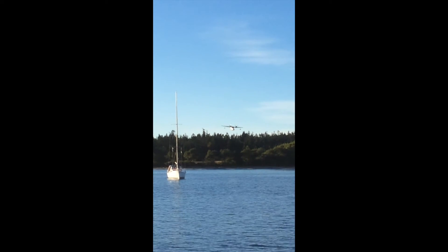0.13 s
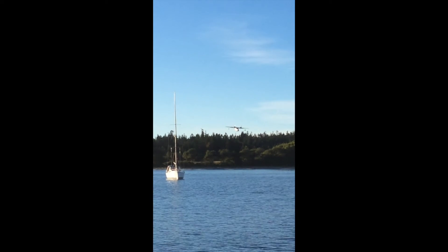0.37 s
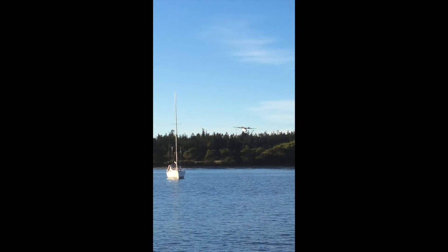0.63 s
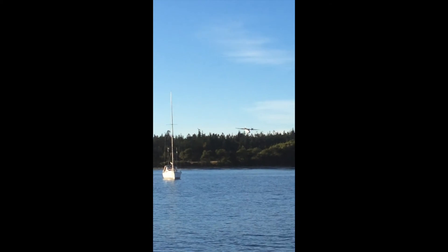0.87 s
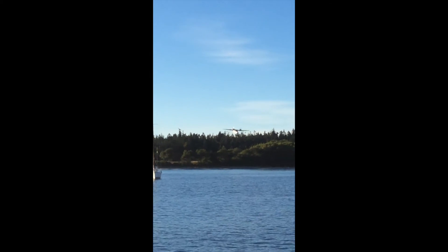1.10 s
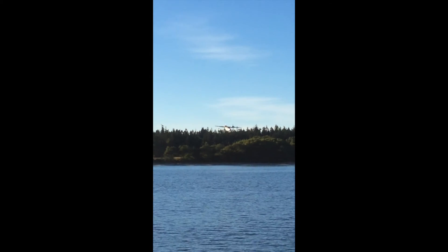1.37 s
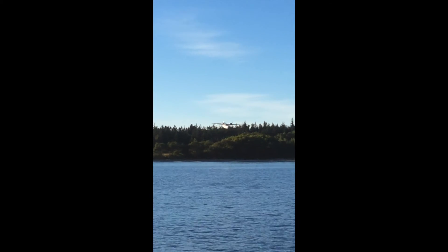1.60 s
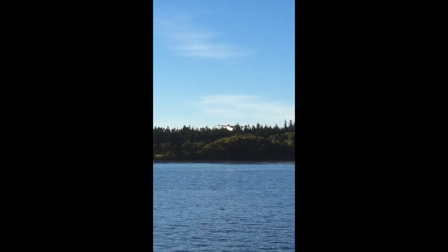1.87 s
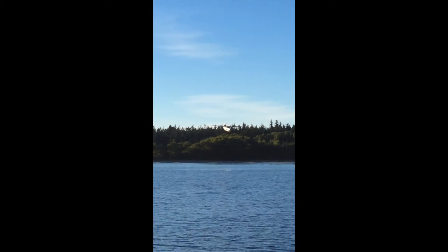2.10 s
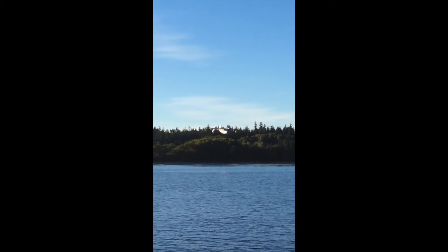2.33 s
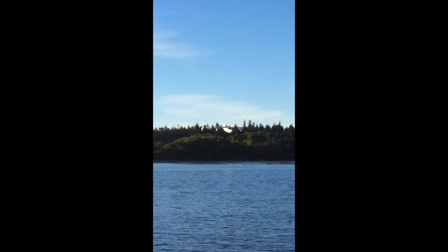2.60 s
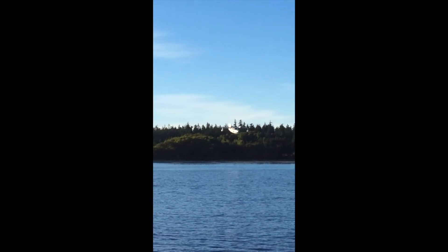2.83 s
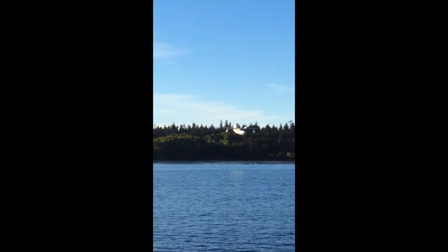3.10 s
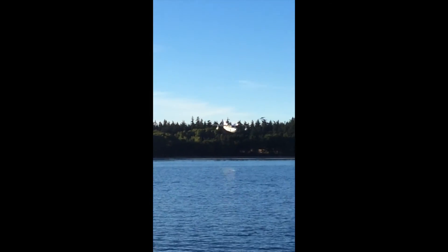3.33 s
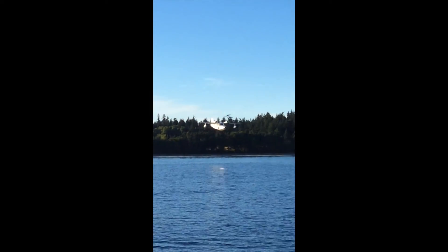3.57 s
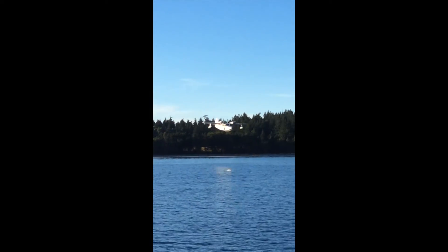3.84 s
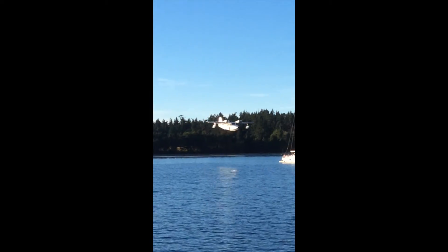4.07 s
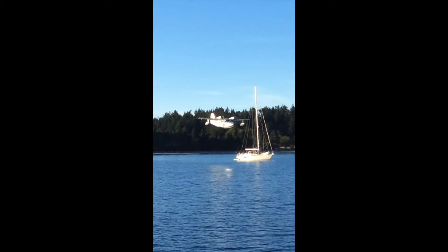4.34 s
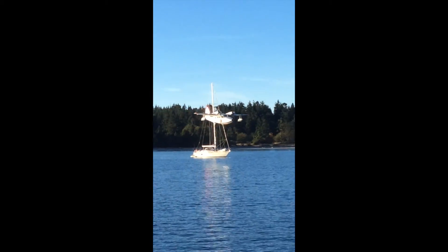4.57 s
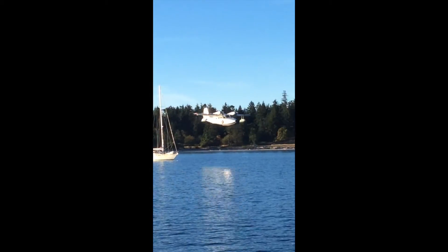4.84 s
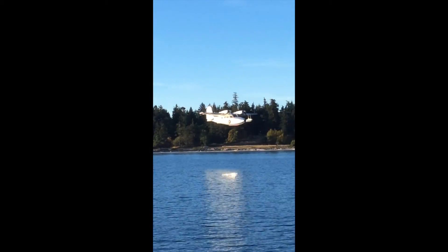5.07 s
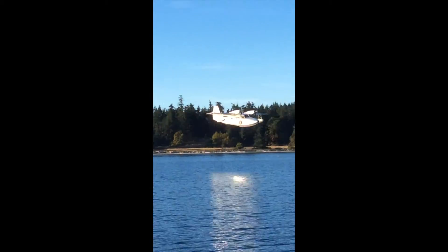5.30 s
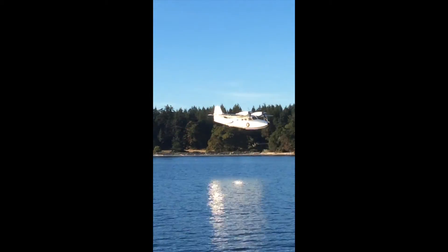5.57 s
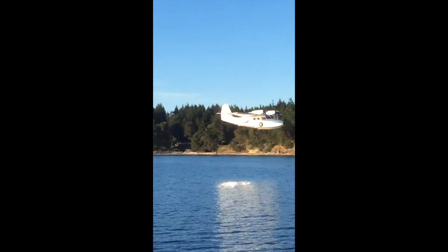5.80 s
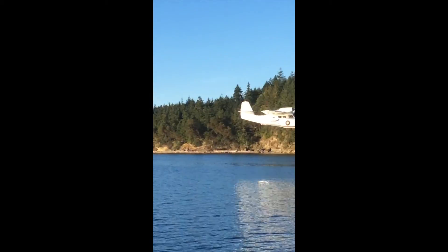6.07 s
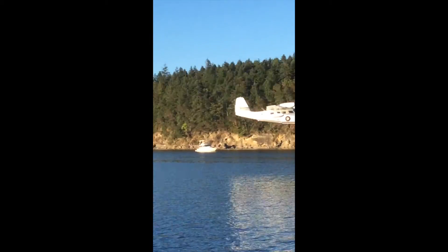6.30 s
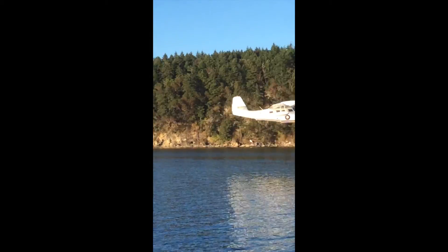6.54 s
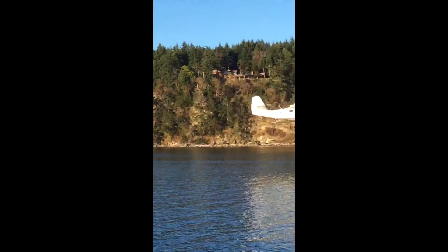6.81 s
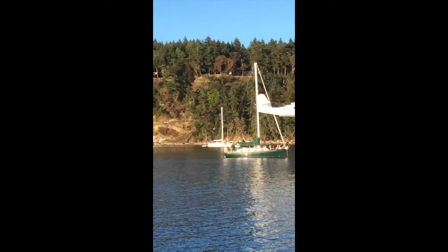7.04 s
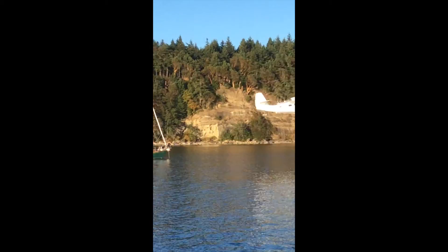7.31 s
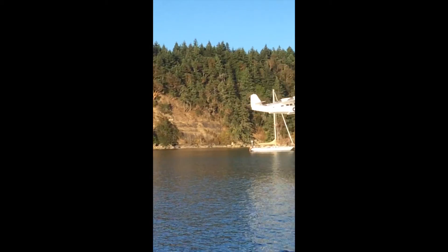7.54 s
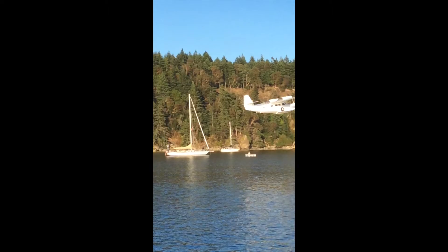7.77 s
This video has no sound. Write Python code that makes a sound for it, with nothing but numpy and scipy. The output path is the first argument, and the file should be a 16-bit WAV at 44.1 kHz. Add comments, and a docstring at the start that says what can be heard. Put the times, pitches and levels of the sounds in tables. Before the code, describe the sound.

Outdoors over open calm water, a twin-engine propeller plane flies in low. Its distant, dull drone pulses slowly as the two engines beat, then grows brighter and louder into a chopped, raspy roar. Around the close pass the pitch slides down while the roar stays strong. A small handheld microphone adds faint hiss and boxy colour, with soft wind thumps that become heavier toward the end.

```python
"""Over calm water a twin-engine propeller plane comes in low and passes a small microphone.
Two nine-cylinder engines with three-blade propellers run nearly in step: their tones, summed by
shaft order, swell and fade as they beat. Chopped noise makes the roar; the air dulls it from afar
and the water's echo draws a moving comb through it. Low noise and single pressure pulses are the
gusts that thump the microphone; faint hiss, housing, hand and a treble step colour the whole."""
import sys
import numpy as np
from scipy import signal
from scipy.io import wavfile
from scipy.ndimage import uniform_filter1d

SR = 44100
rng = np.random.default_rng(int(sys.argv[2]) if len(sys.argv) > 2 else 0)


def inscribe(sig):
    """Save sig as 16-bit PCM at rate SR to the path in sys.argv[1].

    A 1-D sig is mono; a 2-D sig holds one channel per row.
    Samples are clipped to [-1, 1] before scaling.
    """
    pcm = np.round(np.clip(np.atleast_2d(sig).T, -1, 1) * 32767)
    wavfile.write(sys.argv[1], SR, pcm.astype(np.int16))


def gain_from_db(level_db):
    """Turn a decibel level (scalar or array-like) into a linear amplitude factor."""
    decades = np.asarray(level_db, float) / 20
    return 10 ** decades


N = 348831
T = np.arange(N) / SR  # s

# How far one engine has turned ahead of the other. Each row: time in seconds, lead in turns.
LEAD_TURNS = [(0.0, -0.0), (1.0, 0.052), (1.9, 0.221), (2.5, 0.421), (3.1, 0.614), (3.7, 0.75),
              (4.3, 0.906), (4.8, 1.09), (5.4, 1.215), (5.9, 1.266), (6.5, 1.46), (7.1, 1.598),
              (7.91, 1.66)]
# Sound path to the microphone. Each row: time in seconds, roar level in dB, water echo delay in ms.
SOUND_PATH = [(0, -41.5, 0.94), (.8, -42, 0.91), (1.6, -40.5, 0.86), (2.5, -38.5, .82), (3.4, -39.5, 0.81),
              (4.1, -35.5, 0.87), (5.2, -34, 1.14), (5.5, -35, 1.23), (6.05, -34, 1.29), (6.4, -39, 1.426),
              (6.85, -33.5, 1.47), (7.4, -35, 1.49), (7.91, -36.5, 1.39)]
CLOSEST_M = 87.7  # distance at the closest point


def evened(x):
    """Scales to rms 1."""
    return x / np.sqrt(np.mean(x ** 2))


def curve(rows, t):
    """Columns of a time table, joined by straight lines."""
    s, *columns = np.transpose(rows)
    return [np.interp(t, s, column) for column in columns]


def read(points, hz):
    """A spectrum read on a log-frequency axis."""
    f, value = np.transpose(points)
    return np.interp(np.log(hz + 1), np.log(f + 1), value)


def shaped(x, gain, size=1024):
    """Multiplies the short-time spectrum by gain(Hz, s)."""
    overlap = size * 3 // 4
    hz, t, z = signal.stft(x, SR, nperseg=size, noverlap=overlap)
    z = z * gain(hz[:, None], t)
    return signal.istft(z, SR, nperseg=size, noverlap=overlap)[1][:N]


def wander(seconds):
    """Slow chance of rms 1: white noise averaged twice over the given time."""
    size = round(seconds * SR)
    once = uniform_filter1d(rng.standard_normal(N), size)
    return evened(uniform_filter1d(once, size))


def flight():
    """Straight pass: heard shaft speed, distance and angle off the nose, late by the travel time."""
    shaft_hz, speed_m_s, closest_s, sound_m_s = 36.34, 58.86, 6.58, 343
    sent = np.linspace(-5, 10, 3000)  # moments of emission, s
    along = speed_m_s * (sent - closest_s)
    metres = np.hypot(along, CLOSEST_M)
    heard_hz = shaft_hz / (1 + speed_m_s / sound_m_s * along / metres)  # Doppler shift
    off_nose = np.arccos(-along / metres)  # radians
    arrival = sent + metres / sound_m_s
    return [np.interp(T, arrival, column) for column in (heard_hz, metres, off_nose)]


def water_echo(hz, delay_ms, metres):
    """Comb of the direct sound and its mirror in the water; ripples scatter the treble."""
    # 0.68 is the echoed share in the bass nearby; over long paths the echo blurs away
    mirror = 0.68 * np.exp(-hz / 2500 - (metres / 520) ** 4)
    return abs(1 + mirror * np.exp(2j * np.pi * hz * delay_ms / 1000))


def strong_tones(turns, shaft_hz, metres, off_nose):
    """Blade and exhaust tones: the sum of two engines swells and flips sign at each cancelling."""
    # Beat of each tone. Each row: shaft order, half-beats at the start,
    # half-beats gained from ahead to abeam, phase slip from the side in turns.
    beats = [(3, .39, .58, 0), (4.5, .95, -.14, -.06), (6, .12, -.54, .33), (7.5, .79, -.03, 0),
             (9, 1.07, -.08, 0), (10.5, .19, -1.28, 0), (11.5, 1.15, -1.24, 0), (16, 1.2, -1.65, 0),
             (17.5, 1.18, -1.39, 0)]
    # Lowest three tones at their beat peaks, before a slight flutter. Each row: time in seconds,
    # blade pass in dB, firing in dB, second blade harmonic in dB.
    low_tones = [(0, -39, -60, -43.5), (1, -33.5, -51.5, -37.5), (1.6, -39, -57, -43),
                 (2.4, -37, -55.5, -41), (3.6, -38.5, -45, -39), (4.6, -32.5, -42.5, -42),
                 (5, -33, -39, -41), (5.4, -30, -42, -40.5), (5.8, -25, -31.5, -30),
                 (6.3, -31.5, -33, -28.5), (6.8, -28, -35, -28.5), (7.2, -34, -34.5, -38.5),
                 (7.45, -30.5, -38, -40.5), (7.65, -26, -36, -58), (7.91, -27.5, -34, -59)]
    # Upper exhaust tones at their beat peaks and the closest distance, before echo and flutter.
    # One row per order from 7.5 up: level in dB at each of the angles below.
    upper_tones = [(-53, -57, -43.5, -57, -41.5, -41.5), (-49, -41, -49, -39, -36.5, -51),
                   (-59.5, -39.5, -53, -46.5, -45, -58), (-56, -42.5, -56, -41, -53, -50),
                   (-49.5, -62, -41.5, -48.5, -53.5, -48), (-61.5, -57, -43.5, -46, -52.5, -55)]
    # Angles off the nose, in degrees.
    nose_angles = [10, 25, 45, 65, 90, 120]
    # share by which one engine is louder, more once the hull shades the far one
    uneven, uneven_abeam = 0.07, 0.11

    lead, = curve(LEAD_TURNS, T)
    delay_ms = curve(SOUND_PATH, T)[1]
    abeam = 1 - np.cos(off_nose)  # 0 ahead, 1 abeam
    levels = [gain_from_db(db) for db in curve(low_tones, T)]
    for (order, *_), db in zip(beats[len(levels):], upper_tones):
        aimed = gain_from_db(np.interp(np.degrees(off_nose), nose_angles, db))
        echo = water_echo(order * shaft_hz, delay_ms, metres)
        levels.append(aimed * CLOSEST_M / metres * echo)

    out = np.zeros(N)
    for (order, start, gained, slip), level in zip(beats, levels):
        apart = np.pi * (order * lead + start + gained * abeam)
        # all in step, as one steep pulse, but for the slip
        angle = 2 * np.pi * (order * turns - 0.25 + slip * np.sin(off_nose) ** 2)
        angle += 0.02 * order * wander(0.05)  # air blurs the high ones more
        beat = np.cos(apart) * np.cos(angle)
        beat += (uneven + uneven_abeam * abeam) * np.sin(apart) * np.sin(angle)
        flutter = gain_from_db(0.16 * order * wander(0.04))
        out += np.sqrt(2) * level * flutter * beat
    return out


def weak_tones(turns, shaft_hz, metres):
    """Uneven cylinders sound other orders; higher ones beat faster and are blurred more by the air."""
    # Weaker exhaust and blade tones, as multiples of the shaft speed.
    orders = [2, 4, 5, 5.5, 8, 8.5, 9.5, 10, 12, 13, 13.5, 14, 14.5, 15, 15.5, 16.5, 17, 18, 18.5, 19, 20.5,
              21, 22]
    # Their levels before overall gain, distance and echo. Each row: dB from ahead, dB from the side.
    order_levels = [(-65.5, -72), (-54, -66), (-57.5, -91), (-52, -45), (-72.5, -66.5), (-61, -46),
                    (-70, -110), (-59, -46.5), (-74.5, -45.5), (-80.5, -50), (-72.5, -63), (-80, -80),
                    (-60, -50), (-66.5, -49.5), (-62.5, -50.5), (-70, -53), (-56, -63.5), (-77.5, -57),
                    (-65.5, -59.5), (-55, -51.5), (-61, -57), (-63.5, -72), (-60.5, -61.5)]
    gain_db, spread = -0.5, 0.65  # gain at the closest distance; power of 1 / distance

    lead, = curve(LEAD_TURNS, T)
    delay_ms = curve(SOUND_PATH, T)[1]
    # the falling pitch tells how far the plane has come abeam
    side = np.clip((42.5 - shaft_hz) / 2.0, 0, 1)
    blur = 0.007 * wander(0.05)  # turns
    out = np.zeros(N)
    for order, (ahead_db, side_db) in zip(orders, order_levels):
        tone_start, beat_start = rng.random(2)
        beat = np.cos(np.pi * (order * lead + beat_start))
        level = gain_from_db(ahead_db + side * (side_db - ahead_db))
        level = level * water_echo(order * shaft_hz, delay_ms, metres)
        out += 2 * level * beat * np.cos(2 * np.pi * (order * (turns + blur) + tone_start))
    return out * gain_from_db(gain_db) * (CLOSEST_M / metres) ** spread


def roar(turns, shaft_hz, metres, off_nose):
    """Noise chopped by the blades of both engines, dulled by the air and combed by its water echo."""
    # Exhaust and propeller wash near the plane. Each row: frequency in Hz, relative level in dB per Hz.
    roar_spectrum = [(30, -20.5), (60, -8.5), (90, 7), (160, 11.5), (250, 10.5), (330, 5.5), (480, 4.5),
                     (650, 3.5), (900, 6.5), (1450, 0.1), (1700, -3), (3000, -4.5), (6000, -11),
                     (7800, -14.5), (10000, -19.5), (13000, -27), (14200, -33.5), (15200, -39.5)]
    # at 4 kHz: loss beyond the closest distance; exhaust brighter abeam than ahead, and more behind
    air_db_per_100_m, bright_abeam_db = 6.5, 2

    lead, = curve(LEAD_TURNS, T)
    chop = np.cos(6 * np.pi * (turns + lead / 2))
    chop += 0.31 * np.cos(12 * np.pi * (turns - lead / 2))
    chop += 0.077 * np.cos(2 * np.pi * turns)  # one cylinder bank barks louder each turn
    depth = 0.1 + 0.12 * np.clip((42 - shaft_hz) / 6, 0, 1)  # sharper from the side
    noise = rng.standard_normal(N) * (1 + depth * chop) * gain_from_db(0.9 * wander(0.003))

    # smooth chance patches over frequency and time
    patches = rng.standard_normal((N // 256 + 3, 513)).T
    patches = uniform_filter1d(patches, 6, 0)
    patches = evened(uniform_filter1d(patches, 20, 1))
    swell = wander(0.016)  # eddies in the air make the treble waver

    def path(hz, t):
        """Gain from plane to microphone."""
        level_db, delay_ms = curve(SOUND_PATH, t)
        distance = np.interp(t, T, metres)
        loss_db = air_db_per_100_m * (distance - CLOSEST_M) / 100
        loss_db += bright_abeam_db * np.cos(np.interp(t, T, off_nose))
        air_db = loss_db * (hz / 4000) ** 1.054
        side = np.clip((42 - np.interp(t, T, shaft_hz)) / 3, 0, 1)
        bass_db = 7 * side * np.exp(-(hz / 110) ** 2)  # propeller wash rumbles more from the side
        waver_db = 0.96 * np.interp(t, T, swell) * hz / (hz + 4000)
        total_db = read(roar_spectrum, hz) + level_db - air_db + bass_db
        total_db = total_db + 0.98 * patches[:, :len(t)] + waver_db
        return water_echo(hz, delay_ms, distance) * gain_from_db(total_db)

    return shaped(noise, path)


def loud_thumps():
    """Signed impulses, one for each of the loudest thumps of air on the microphone."""
    # Each row: time in seconds, peak level in dB, direction (+1 push or -1 suction).
    thump_list = [(0.25, -42, 1), (0.705, -40, -1), (1, -40, -1), (1.59, -36, -1), (3.199, -34, 1),
                  (3.436, -33, -1), (3.492, -30, -1), (4.212, -33, -1), (4.534, -33, -1), (5.392, -33, 1),
                  (5.453, -32, -1), (5.621, -28, -1), (5.83, -31, 1), (5.998, -38, -1), (6.201, -22, -1),
                  (6.318, -26, 1), (6.368, -30, 1), (6.696, -38, 1), (7.132, -33, -1), (7.199, -27.5, -1),
                  (7.266, -27, -1), (7.383, -40, -1), (7.427, -26, 1), (7.556, -27, 1), (7.632, -23, 1),
                  (7.702, -37, 1), (7.752, -26, 1)]
    s, db, way = np.transpose(thump_list)
    train = np.zeros(N)
    train[np.round(s * SR).astype(int)] = gain_from_db(db) * np.sign(way)
    return train


def buffeting(train):
    """Lumpy low noise of air buffeting the microphone, bursting around each loud thump."""
    # Steady buffeting between thumps, before chance swells. Each row: time in seconds, level in dB.
    steady = [(0, -54), (3, -70), (3.75, -64), (4.1, -60), (4.6, -58), (5, -48), (6, -52), (7, -54),
              (7.91, -45)]
    # Its colour. Each row: frequency in Hz, relative level in dB per Hz.
    gust_spectrum = [(8, -9.5), (25, -4), (45, -6), (80, 3.5), (140, -6.5), (300, -36), (700, -110)]
    swing_db, burst_db, burst_s = 2, -22, 0.03  # rms of swells; burst below thump peak; its sigma

    lumps = rng.standard_normal(N) * gain_from_db(4.2 * wander(0.006))
    low = evened(shaped(lumps, lambda hz, t: gain_from_db(read(gust_spectrum, hz)), size=4096))
    bell = signal.windows.gaussian(SR // 2, burst_s * SR)
    bursts = signal.oaconvolve(abs(train), bell, "same")
    steady_db = curve(steady, T)[0] + swing_db * wander(0.028)
    return low * (gain_from_db(steady_db) + gain_from_db(burst_db) * bursts)


def thumps(train):
    """Single pressure pulses: each a short push or suction inside a slower rebound."""
    small_per_s, small_db, small_spread_db = 2.6, -57, 3.5  # small thumps that come by chance
    ms = np.arange(-1200, 1200) / SR * 1000
    pulse = np.exp(-(ms / 2.4) ** 2) - 0.36 * np.exp(-(ms / 6.5) ** 2)
    struck = rng.random(N) < small_per_s / SR
    peaks = gain_from_db(small_db + small_spread_db * rng.standard_normal(N))
    small = struck * peaks * rng.choice([-1, -1, 1], N)  # suction twice as likely as push
    return signal.oaconvolve(train + small, pulse / pulse.max(), "same")


def self_noise():
    """Microphone hiss: shaped noise at a steady level."""
    # Each row: frequency in Hz, relative level in dB per Hz.
    hiss_spectrum = [(100, 4), (3000, -11), (6500, 11), (9500, 6.5), (15000, 5.5)]
    hiss = evened(shaped(rng.standard_normal(N), lambda hz, t: gain_from_db(read(hiss_spectrum, hz))))
    return gain_from_db(-87) * hiss


def housing_db(hz, t):
    """Resonances and dips of housing and hand, shifting as the hand swings round after the plane."""
    # How far the hand has swung round. Each row: time in seconds, share from 0 to 1.
    hand_swing = [(0, 0.18), (3.5, 0), (5, 0.4), (6, 0.37), (6.8, 0.85), (7.91, 1)]
    # Each row: centre in Hz, width (two sigma) in Hz, gain in dB before the swing, gain in dB after.
    resonances = [(504, 95, 1.5, -11.5), (570, 70, -0.5, 4), (710, 42, 2, 2.5), (830, 130, -3.5, -2.5),
                  (1016, 94, 5, 3), (1254, 107, 9, 4), (1440, 210, 7, -1.5), (1710, 130, 0, -0.5),
                  (1890, 37, 5.5, 3.5), (2150, 234, -2.5, -10), (2253, 68, 9.5, -4.5), (2325, 97, -12, 9),
                  (2640, 270, 11.5, 2), (2800, 150, -3.5, -9), (3250, 100, 8.5, 0.5), (3533, 51, 10.5, -9),
                  (3710, 100, 3.5, -0.5), (3800, 140, -2.5, 4), (4140, 160, 2.5, -12),
                  (4230, 200, 0.5, 9.5), (4540, 400, 5, -1), (5400, 1000, 4.5, 0.5), (7360, 52, -6, 4.5)]
    swing, = curve(hand_swing, t)
    bumps_db = 0
    for f, width, before, after in resonances:
        bump = np.exp(-2 * ((hz - f) / width) ** 2)
        bumps_db = bumps_db + (before + swing * (after - before)) * bump
    return bumps_db


def treble_step_db(hz):
    """The recorder's own colour: an abrupt rise of its treble above 8 kHz."""
    step_hz, step_db = 8000, 7.5
    return step_db / (1 + np.exp(np.clip((step_hz - hz) / 25, -50, 50)))


def scene():
    """Plane and wind."""
    shaft_hz, metres, off_nose = flight()
    turns = np.cumsum(shaft_hz) / SR
    plane = strong_tones(turns, shaft_hz, metres, off_nose)
    plane = plane + weak_tones(turns, shaft_hz, metres)
    plane = plane + roar(turns, shaft_hz, metres, off_nose)
    train = loud_thumps()
    wind = buffeting(train) + thumps(train)
    return (plane + wind)[None]


def band_limit(x):
    """A steep low-pass at the top of the band."""
    return signal.sosfilt(signal.butter(12, 15210, fs=SR, output="sos"), x)


def record(dry):
    """Adds the microphone's self-noise, then the colour of housing and hand and the treble step."""
    noisy = dry[0] + self_noise()
    mix = shaped(noisy, lambda hz, t: gain_from_db(housing_db(hz, t) + treble_step_db(hz)))[None]
    return band_limit(mix)


dry = scene()
out = record(dry)
inscribe(out)
```